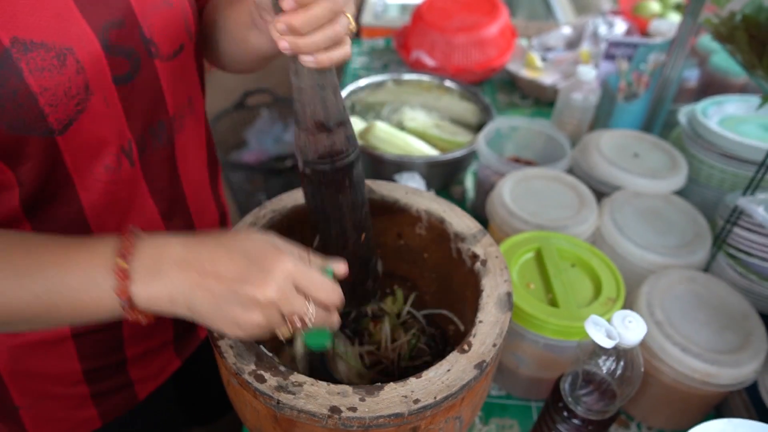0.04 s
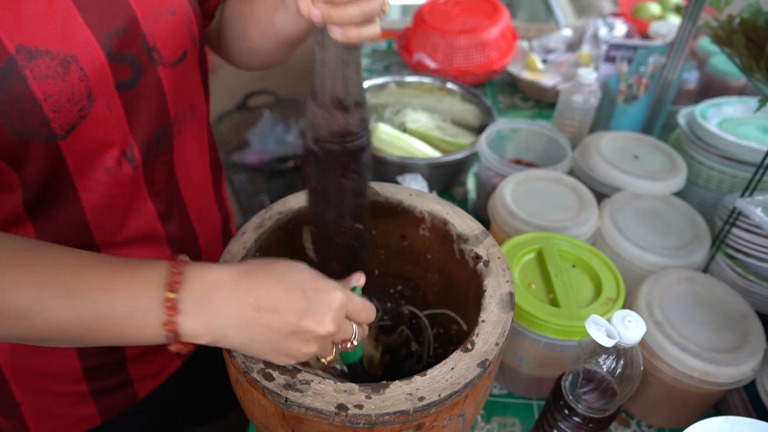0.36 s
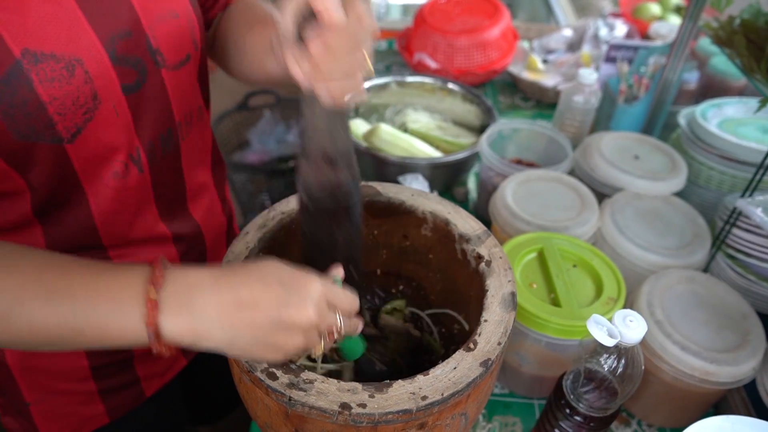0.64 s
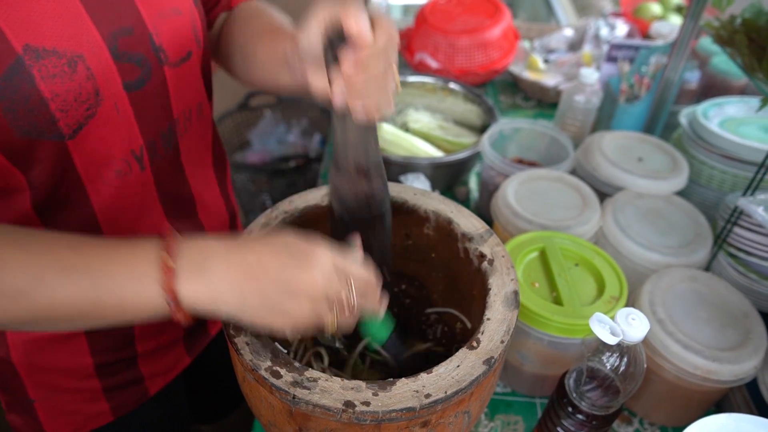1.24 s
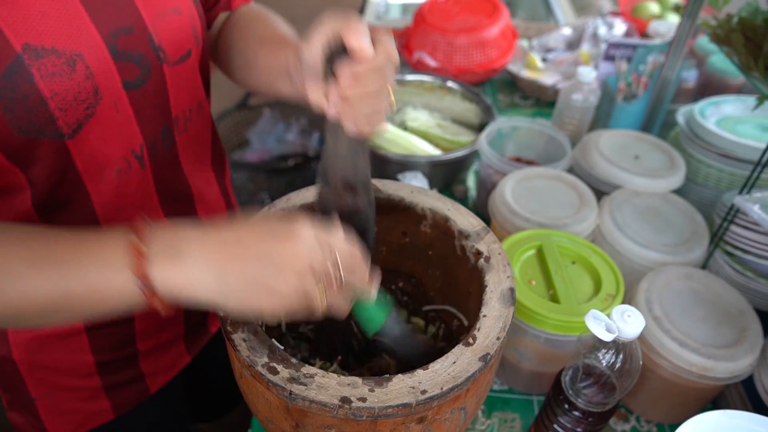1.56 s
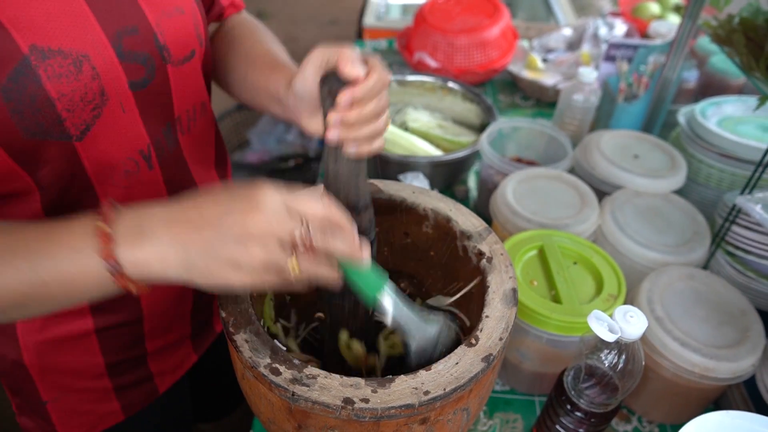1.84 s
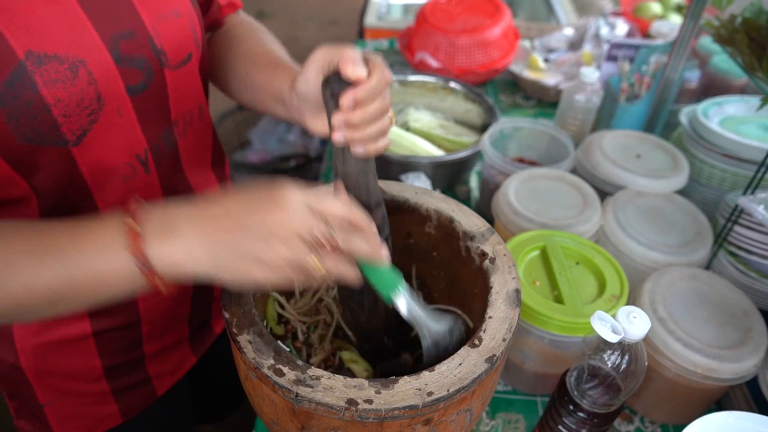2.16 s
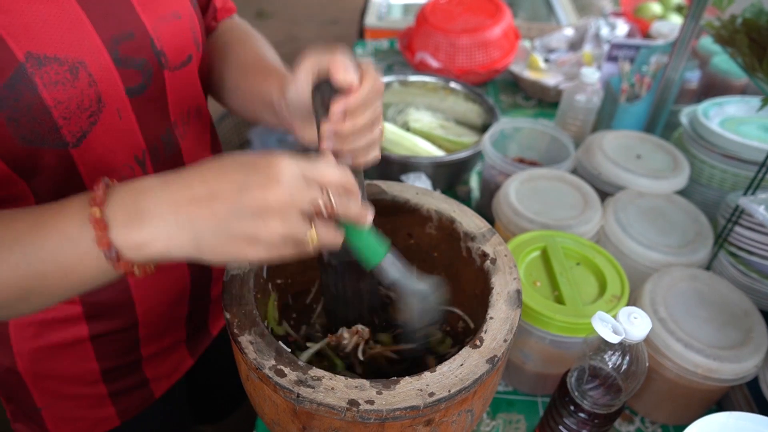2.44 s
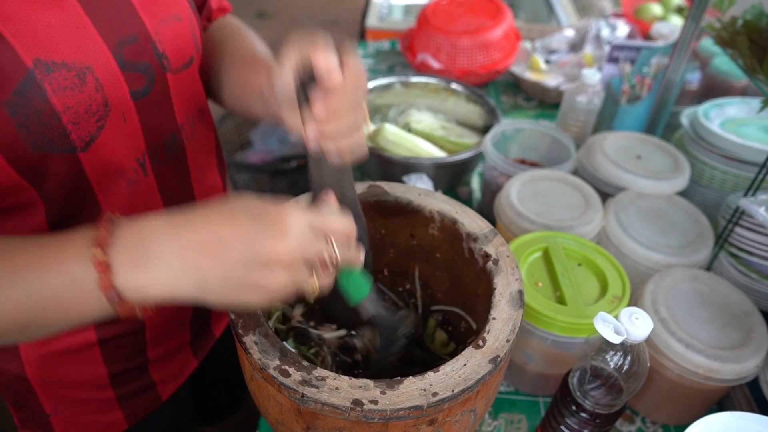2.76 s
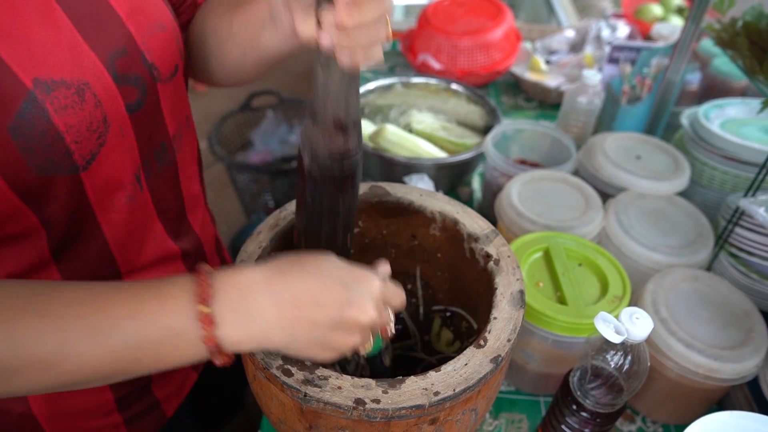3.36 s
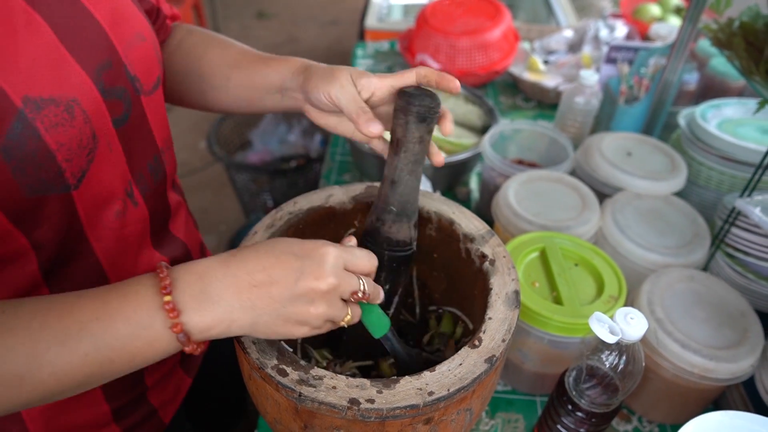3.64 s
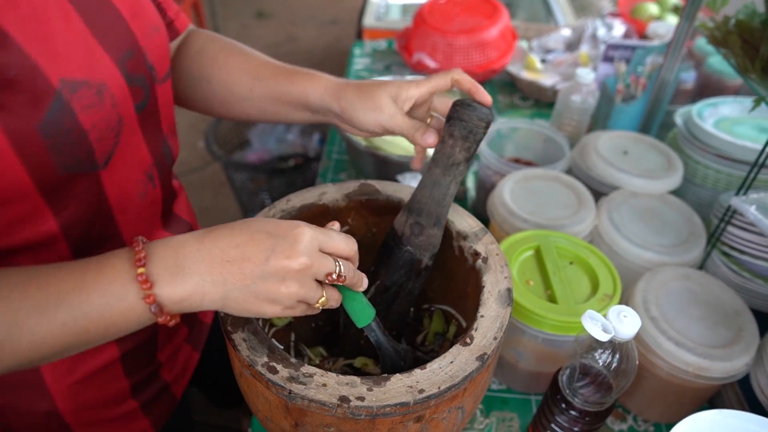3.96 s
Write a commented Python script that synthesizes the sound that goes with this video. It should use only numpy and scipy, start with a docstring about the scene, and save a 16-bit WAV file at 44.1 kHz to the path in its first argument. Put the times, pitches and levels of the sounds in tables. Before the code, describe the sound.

A wooden pestle pounds wet salad in a clay mortar, close by. First a steel spoon scrapes through squelching pulp; from 0.5 seconds come hollow, uneven thuds, about three a second, until 3.5 seconds. Between them the spoon stirs and taps the wall, with wet pops and crisp snaps around 2.1 seconds. A faint squeak and rub follow near 3.8 seconds. Low outdoor rumble and hiss continue throughout.

```python
"""Over the low rumble and hiss of an open-air stall, a steel spoon scrapes through wet shredded salad
in a clay mortar, close by. The pulp squelches, pops and fizzes, coloured by the bowl's hollow, and the
spoon taps the wall. Half a second in, a wooden pestle starts pounding, about three blows a second,
each ringing the clay and thudding in the food. Between blows the spoon turns the salad over; now and
then a shred snaps or the pestle pulls free with a gulp. Near the end come a faint squeak and a rub."""
import sys
import numpy as np
from scipy import signal
from scipy.fft import rfft, irfft, next_fast_len
from scipy.io import wavfile
from scipy.ndimage import map_coordinates

SR = 44100
rng = np.random.default_rng(int(sys.argv[2]) if len(sys.argv) > 2 else 0)


def wav_record(signal):
    """Record a signal, one row per channel, as 16-bit PCM in the file named by sys.argv[1]."""
    frames = np.transpose(np.atleast_2d(signal))
    bounded = np.clip(frames, -1, 1)
    # unit amplitude maps onto the largest positive 16-bit level
    quanta = np.round(bounded * 32767).astype(np.int16)
    wavfile.write(sys.argv[1], SR, quanta)


N = 176400

# the stall's rumble and hiss: freq_hz, level_db
STALL_EQ = [(25, -16), (55, -1), (108, -0.5), (160, -7.5), (700, -18.5), (1800, -15), (9000, -28),
            (16000, -35)]
# spoon strokes through the pulp: peak_s, level_db, pitch_hz, swish_db
SPOON_STROKES = [(.045, -24.5, 2360, -24), (0.386, -22, 1970, -28), (.698, -22.5, 2130, -27.5),
                 (1.02, -25.5, 2060, -27.5), (1.325, -28, 2180, -27.5), (1.678, -28.5, 2270, -29),
                 (1.989, -26.5, 1580, -26.5), (2.316, -30.5, 2040, -27.5), (2.66, -26, 2250, -27),
                 (2.997, -28, 1430, -30), (3.344, -28.5, 1910, -30.5)]
# a stroke's bright swish: freq_hz, level_db
SWISH_EQ = [(700, -18), (2700, 8), (5000, 1), (11000, -1.5), (16000, -12)]
# squeezes of the pulp: peak_s, rise_s, level_db, pitch_hz, relative_fizz_db
SQUEEZES = [(.246, 0.17, -23.5, 1360, -17), (.555, 0.13, -22, 1910, -14), (.903, 0.13, -24.5, 1780, -15),
            (1.2, 0.19, -29.5, 1810, -10.5), (1.526, 0.14, -24.5, 1790, -14.5),
            (1.862, 0.14, -22, 1900, -12), (2.145, 0.074, -24.5, 1780, -12.5),
            (2.515, 0.15, -31, 1550, -10.5), (2.835, 0.073, -26.5, 1920, -14), (3.165, 0.1, -28, 1810, -10),
            (3.546, 0.11, -21, 1960, -10.5)]
# fizzing juice: freq_hz, level_db
FIZZ_EQ = [(300, -44), (2500, 10.5), (6300, 3), (8500, 0), (11000, -3.5), (16000, -11)]
# wet splash and seep: freq_hz, level_db
SPLASH_EQ = [(300, -53), (1600, 7), (2600, 8), (4000, -1.5), (16000, -15.5)]
# wet pops, and the clay ringing under two spoon taps: start_s, level_db, pitch_hz
SHORT_NOTES = [(0.176, -7, 1970), (0.2578, -11, 1010), (0.4121, -12, 1610), (0.5576, -11.5, 1890),
               (0.6922, -6.5, 2630), (0.8663, -9.5, 1720), (1.4566, -14, 2780), (1.5347, -10.5, 1760),
               (1.6359, -4, 2115), (1.7634, -10, 1866), (1.8003, -9.5, 2310), (2.0639, -5, 2120),
               (2.5121, -11.5, 1420), (2.5664, -6.5, 1543), (2.759, -13.5, 1820), (2.807, -9, 1740),
               (2.919, -7, 1540), (3.1854, -12.5, 2236), (3.6749, -14, 2564)]
# spoon against the clay: start_s, level_db
SPOON_TAPS = [(.2891, -12.5), (0.6498, -15.5), (0.9827, -15.5), (1.242, -16.5), (2.2867, -17),
              (2.5669, -21), (2.923, -18), (3.241, -17.5)]
# the click of a tap or snap: freq_hz, level_db
CLICK_EQ = [(1500, -22), (2800, 7.5), (4500, 1), (6000, -6.5), (8500, 2.5), (11000, 1.5), (16000, -12)]
# ringing steel: pitch_hz, level_db, t60_s
SPOON_MODES = [(2920, -15, 0.056), (8300, -1, 0.09), (9500, -11, .06)]
# the mortar with the pestle in it: pitch_hz, level_db, t60_s
MORTAR_MODES = [(231.4, -15.5, 0.11), (487.8, -3.5, 0.2), (1030, -10.5, 0.097), (1290, -11.5, 0.031),
                (1510, -13.5, 0.067)]
# pestle blows: start_s, level_db, hardness_db_per_octave, bend_octaves
PESTLE_BLOWS = [(0.498, -17.5, 8.5, 0.068), (.823, -28, 4, .25), (1.13, -13.5, 0, 0.071),
                (1.427, -15.5, 9.5, -0.0065), (1.764, -16.5, -24, 0.27), (2.138, -18.5, 1, -0.13),
                (2.438, -27, 3, 0.22), (2.769, -16, 5.5, 0.418), (3.085, -12, -8, 0.23),
                (3.442, -16.5, 7.5, 0.12), (3.995, -14, 0.5, -0.015)]
# food crushed under a blow: freq_hz, level_db
THUD_EQ = [(40, -12), (110, -5), (450, 7.5), (1200, -0.5), (2200, -4.5), (10000, -59)]
# the pestle grinding on: freq_hz, level_db
GRIND_EQ = [(65, -12), (110, 16), (200, 1), (460, 14), (700, -7.5), (5000, -55)]
# crisp shreds breaking: start_s, level_db
SHRED_SNAPS = [(0.8598, -27), (2.0747, -15), (2.102, -18.5), (2.1227, -27), (2.2095, -14)]
# the pestle pulling free: start_s, level_db
PESTLE_GULPS = [(.92, -19), (1.2, -16.5), (1.85, -15), (2.157, -18), (3.155, -15)]
# soft rub and faint squeak: peak_s, half_length_s, level_db, pitch_hz, half_width_hz
LIGHT_STROKES = [(3.84, 0.041, -38, 1790, 670), (3.72, .03, -47, 4100, 270)]
# air resonances of the bowl: pitch_hz, width_hz, level_db
BOWL_MODES = [(483.7, 32, 6), (1006, 78, -2)]
# stereo width: freq_hz, side_db
SIDE_EQ = [(100, -39.5), (300, -16), (2500, -10.5), (12000, -3.5)]
# stereo lean: freq_hz, left_minus_right_db
PAN_EQ = [(250, 0), (2500, 1), (5000, 3)]

BUBBLES_PER_S, BUBBLE_T60_CYCLES, BUBBLE_SCATTER_DB = 1700, 23.6, 3.5
FIZZ_PER_S = 2000
FITS_DB, FITS_PER_S = 5, 120  # fibres give way in fits
HIT_TIME = np.arange(SR // 4) / SR  # seconds into one hit


def amp(db):
    """Decibels to gain."""
    return 10 ** (np.asarray(db) / 20)


def unit(x):
    """Scale to rms 1."""
    return x / np.sqrt(np.mean(x ** 2) + 1e-20)


def along(points, hz):
    """Read an EQ curve on a log frequency axis."""
    freqs, values = np.transpose(points)
    return np.interp(np.log(hz + 1), np.log(freqs + 1), values)


def filtered(x, response):
    """Shape x with a gain that depends on frequency."""
    n = x.shape[-1]
    padded = next_fast_len(n + 8192)
    return irfft(rfft(x, padded) * response(np.fft.rfftfreq(padded, 1 / SR)), padded)[..., :n]


def coloured(x, eq):
    """x through an EQ curve, at rms 1."""
    return unit(filtered(x, lambda hz: amp(along(eq, hz))))


def add(track, start_s, sound):
    """Mix a sound into a track."""
    start = max(round(start_s * SR), 0)
    part = track[start:start + len(sound)]
    part += sound[:len(part)]


def stall():
    """A steady bed of outdoor rumble and hiss."""
    return amp(-40.5) * coloured(rng.standard_normal(N), STALL_EQ)


def bubbles(pitch_hz, octaves_per_s, spread_octaves, count=700):
    """Time around t = 0 and a cloud of bubbles, sinking in pitch as they grow larger."""
    half_s = count / BUBBLES_PER_S / 2
    when = rng.uniform(-half_s, half_s, count)
    hz = pitch_hz * 2 ** (octaves_per_s * when + spread_octaves * rng.standard_normal(count))
    size = amp(BUBBLE_SCATTER_DB * np.minimum(rng.exponential(size=count), 4))
    size *= rng.choice([-1, 1], count)
    age = np.arange(SR // 80)
    cycles = np.minimum(hz, SR / 3)[:, None] * age / SR
    grains = size[:, None] * np.sin(2 * np.pi * cycles) * amp(-60 * cycles / BUBBLE_T60_CYCLES)
    starts = ((when + half_s) * SR).astype(int)
    cloud = np.bincount((starts[:, None] + age).ravel(), grains.ravel())
    return np.arange(len(cloud)) / SR - half_s, unit(cloud)


def swell(t, rise_s, fall_s, depth_db=29.5):
    """An envelope peaking at t = 0, depth_db down at rise_s before and fall_s after."""
    distance = np.maximum(-t / rise_s, t / fall_s)
    return amp(-depth_db * np.minimum(distance, 10) ** 1.315)


def crackle(per_s, scatter_db):
    """Tiny bubbles in 14 sizes, each size bursting at its own random moments."""
    out = np.zeros(N)
    for hz in np.geomspace(1150, 14700, 14):
        bursts = rng.random(N) < per_s / SR
        sign = rng.choice([-1, 1], N)
        strength = amp(scatter_db * np.minimum(rng.exponential(size=N), 4))
        out += signal.lfilter(*signal.iirpeak(hz, Q=4.4, fs=SR), bursts * sign * strength)
    return out


def fits():
    """A fast, smooth flutter of level in dB as fibres give way."""
    return FITS_DB * map_coordinates(rng.standard_normal(N), [np.arange(N) * FITS_PER_S / SR])


def scrapes(rise_s=0.05, fall_s=0.088, swish_lead_s=0.014):
    """Each spoon stroke opens with a bright swish, then gurgles downward; light strokes only rub."""
    gurgle, swish_envelope = np.zeros((2, N + SR))  # one second of pre-roll
    for peak_s, db, hz, swish_db in SPOON_STROKES:
        t, cloud = bubbles(hz, octaves_per_s=-12.5, spread_octaves=0.23)
        start_s = 1 + peak_s + t[0]
        add(gurgle, start_s, amp(db) * swell(t, rise_s, fall_s) * cloud)
        add(swish_envelope, start_s, amp(swish_db) * swell(t + swish_lead_s, rise_s, fall_s))
    swish = swish_envelope[SR:] * coloured(crackle(FIZZ_PER_S, scatter_db=7.5), SWISH_EQ)
    return (gurgle[SR:] + swish + rubs()) * amp(fits() / 2)


def squelches(fall_s=0.058, fizz_lead_s=0.007):
    """Squeezed pulp fizzes with juice, then swells with bubbles, over a faint, constant seep."""
    bubbling, fizz_envelope = np.zeros((2, N + SR))  # one second of pre-roll
    for peak_s, rise_s, db, hz, fizz_db in SQUEEZES:
        t, cloud = bubbles(hz, octaves_per_s=-4.5, spread_octaves=0.425)
        start_s = 1 + peak_s + t[0]
        add(bubbling, start_s, amp(db) * swell(t, rise_s, fall_s) * cloud)
        add(fizz_envelope, start_s, amp(db + fizz_db + 6) * swell(t + fizz_lead_s, rise_s, fall_s))
    flutter_db = fits()
    fizz = fizz_envelope[SR:] * coloured(crackle(FIZZ_PER_S, scatter_db=8), FIZZ_EQ)
    seep = amp(-43.5) * coloured(crackle(per_s=150, scatter_db=3.75), SPLASH_EQ)
    return amp(flutter_db / 2) * (bubbling[SR:] + seep) + amp(flutter_db) * fizz


def burst(eq, t60_s):
    """A dying puff of noise."""
    return coloured(rng.standard_normal(len(HIT_TIME)), eq) * amp(-60 * HIT_TIME / t60_s)


def short_notes(note_t60_s=0.035):
    """Pitched blips with a splash of noise: wet pops, and the clay ringing under two spoon taps."""
    out, t = np.zeros(N), HIT_TIME
    for start_s, db, hz in SHORT_NOTES:
        note = amp(-8 - 60 * t / note_t60_s) * np.sin(2 * np.pi * hz * t)
        splash = amp(-10.5) * burst(SPLASH_EQ, t60_s=0.036)
        add(out, start_s, amp(db) * (note + splash))
    return out


def ring(modes, hardness=0, bend_octaves=0, settle_s=0.01344, detune=0.0073):
    """Struck modes settle from any bend; hardness tilts those above the second, in dB an octave."""
    t = HIT_TIME
    hz, db, t60_s = np.transpose(modes)[:, :, None]
    level_db = db + hardness * np.maximum(np.log2(hz / hz[1]), 0)
    detuned_hz = hz * (1 + detune * rng.uniform(-1, 1, hz.shape))
    bend = 2 ** (bend_octaves * np.exp(-t / settle_s))
    phase = 2 * np.pi * np.cumsum(detuned_hz * bend, axis=1) / SR
    return np.sum(amp(level_db - 60 * t / t60_s) * np.sin(phase), axis=0)


def taps():
    """The spoon hits the wall: a sharp click, a faint steel ring and the clay's answer."""
    out = np.zeros(N)
    for start_s, db in SPOON_TAPS:
        clay = amp(-17.5) * ring(MORTAR_MODES, hardness=11)
        click = amp(0.5) * burst(CLICK_EQ, t60_s=0.018)
        steel = amp(-26) * ring(SPOON_MODES)
        add(out, start_s, amp(db) * (click + steel + clay))
    return out


def pestle(attack_s=0.00086, grind_delay_s=0.044, grind_width_s=0.069):
    """Each blow rings the mortar, thuds in the food and grinds on; the pitch settles as it sinks in."""
    out, t = np.zeros(N), HIT_TIME
    attack = 1 - np.exp(-t / attack_s)
    pressure = np.exp(-0.5 * ((t - grind_delay_s) / grind_width_s) ** 2)
    for start_s, db, hardness, bend_octaves in PESTLE_BLOWS:
        clay = ring(MORTAR_MODES, hardness, bend_octaves)
        thud = amp(-4) * burst(THUD_EQ, t60_s=0.051)
        grind = amp(-18) * pressure * coloured(rng.standard_normal(len(t)), GRIND_EQ)
        add(out, start_s, amp(db) * (attack * (clay + thud) + grind))
    return out


def snaps():
    """Crisp shreds break with a tiny click."""
    out = np.zeros(N)
    for start_s, db in SHRED_SNAPS:
        add(out, start_s, amp(db) * burst(CLICK_EQ, t60_s=0.013))
    return out


def gulps(pitch_hz=443.3, rise_s=0.0064):
    """A short hollow note as the pestle pulls free."""
    out, t = np.zeros(N), HIT_TIME
    note = t / rise_s * np.exp(-t / rise_s) * np.sin(2 * np.pi * pitch_hz * t)
    for start_s, db in PESTLE_GULPS:
        add(out, start_s, amp(db) * note)
    return out


def rubs():
    """Light spoon strokes squeak and rub: brief swells of narrow noise."""
    out, t = np.zeros(N), np.arange(N) / SR
    for peak_s, half_s, db, hz, half_width_hz in LIGHT_STROKES:
        band = filtered(rng.standard_normal(N), lambda f: 1 / (1 + ((f - hz) / half_width_hz) ** 2))
        out += amp(db) * np.exp(-0.5 * ((t - peak_s) / half_s) ** 2) * unit(band)
    return out


def bowl(x):
    """The mortar's hollow adds its air resonances to the sound inside."""
    def resonances(f):
        return sum(amp(db) * 1j * f * width / (hz ** 2 - f ** 2 + 1j * f * width)
                   for hz, width, db in BOWL_MODES)
    return x + filtered(x, resonances)


def reflections(x, t60_s, block=1024):
    """Random tails of unit energy that keep changing as hands and food move."""
    out, t = np.zeros(N), HIT_TIME[:int(t60_s * SR)]
    window = signal.windows.cosine(block)
    for i in range(0, N - block, block // 2):
        tail = rng.standard_normal(len(t)) * amp(-60 * t / t60_s)
        add(out, i / SR, signal.fftconvolve(x[i:i + block] * window, tail / np.linalg.norm(tail)))
    return out


def scene():
    """The mortar sits slightly left; the stall adds a short tail, nearby pots widen the treble."""
    close = pestle() + gulps() + taps() + bowl(squelches() + scrapes() + short_notes() + snaps())
    mid = close + amp(-8.5) * reflections(close, t60_s=0.27) + stall()
    side = filtered(reflections(mid, t60_s=0.01), lambda hz: amp(along(SIDE_EQ, hz)))
    stereo = np.array([mid + side, mid - side])
    pan_share = np.array([[0.5], [-0.5]])
    return filtered(stereo, lambda hz: amp(pan_share * along(PAN_EQ, hz)))


def record(dry, ceiling=0.6, top_hz=16100):
    """Soft clipping rounds the peaks, then the very top is cut away."""
    soft = dry / (1 + (dry / ceiling) ** 4) ** (1 / 4)
    return filtered(soft, lambda hz: hz < top_hz)


dry = scene()
out = record(dry)
wav_record(out)
```